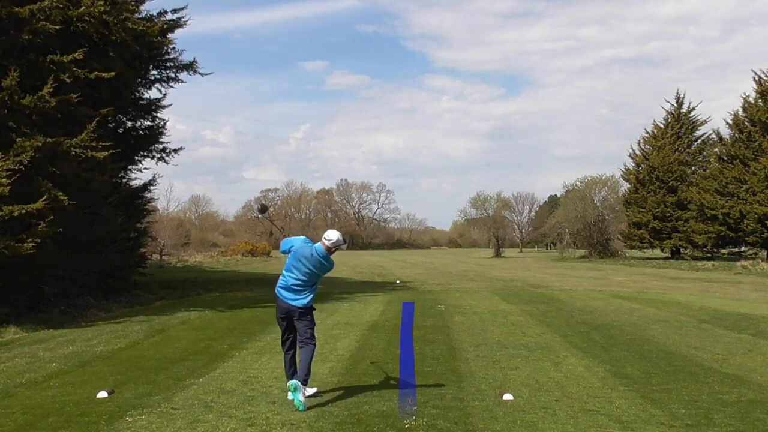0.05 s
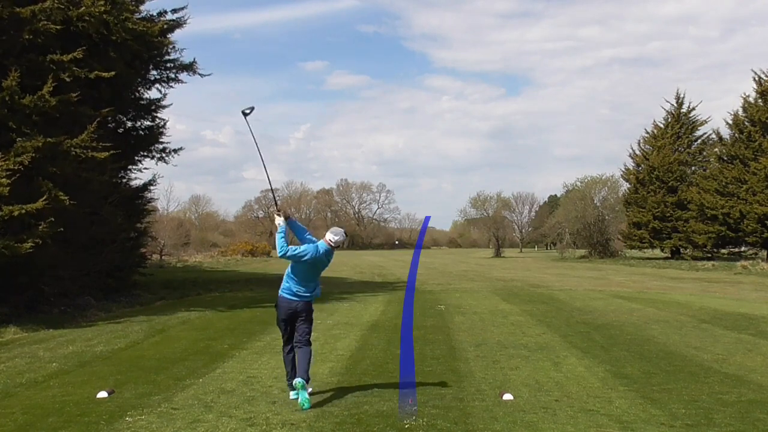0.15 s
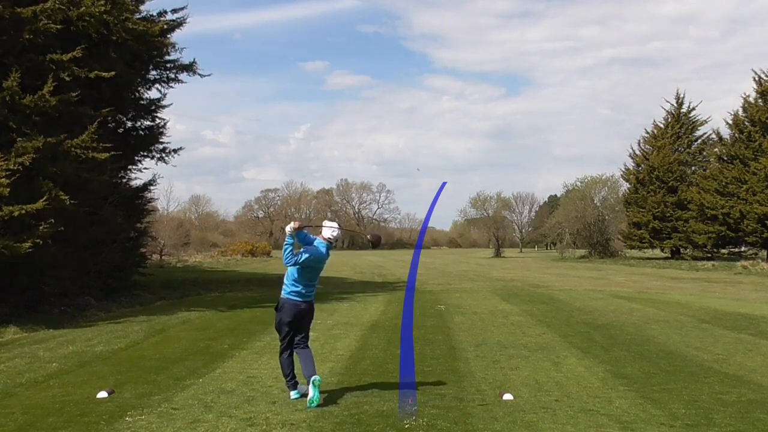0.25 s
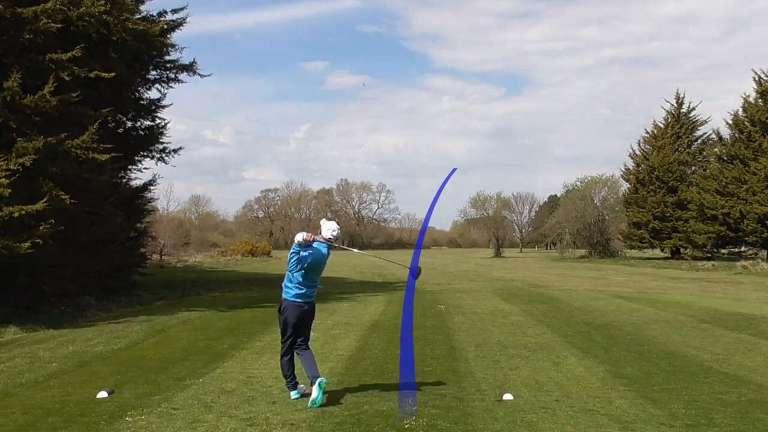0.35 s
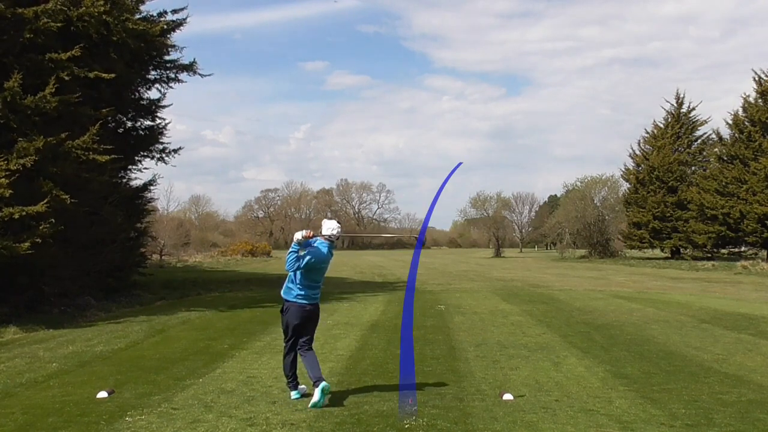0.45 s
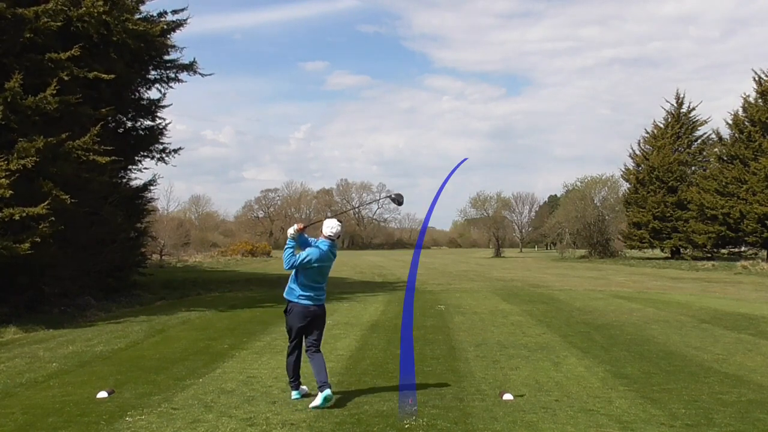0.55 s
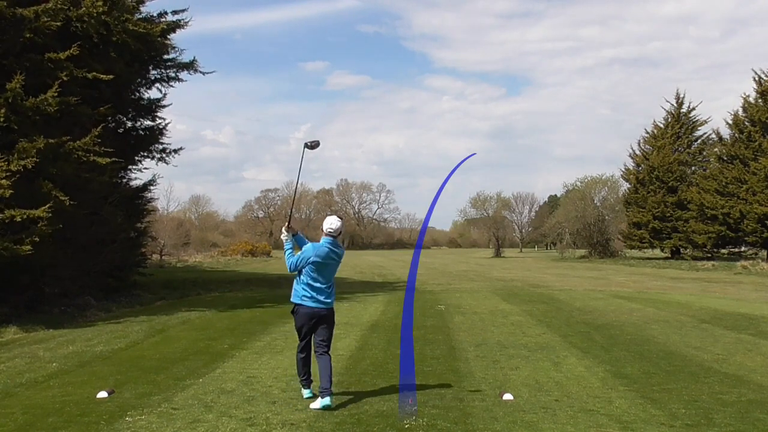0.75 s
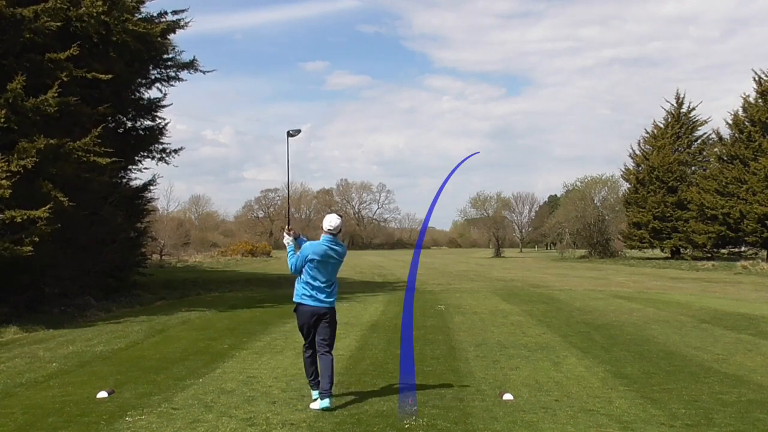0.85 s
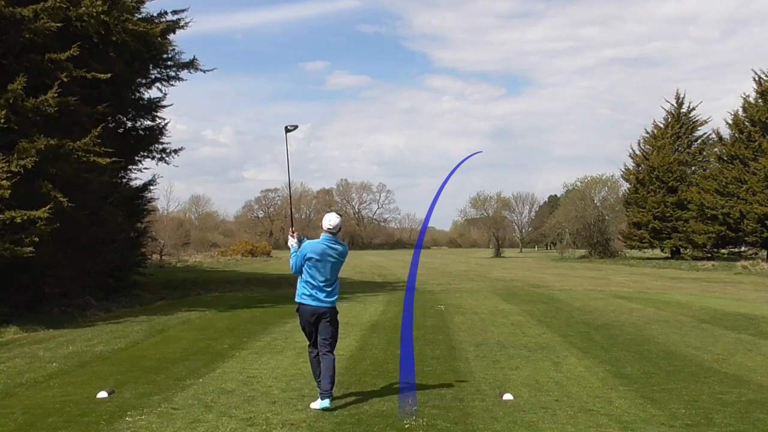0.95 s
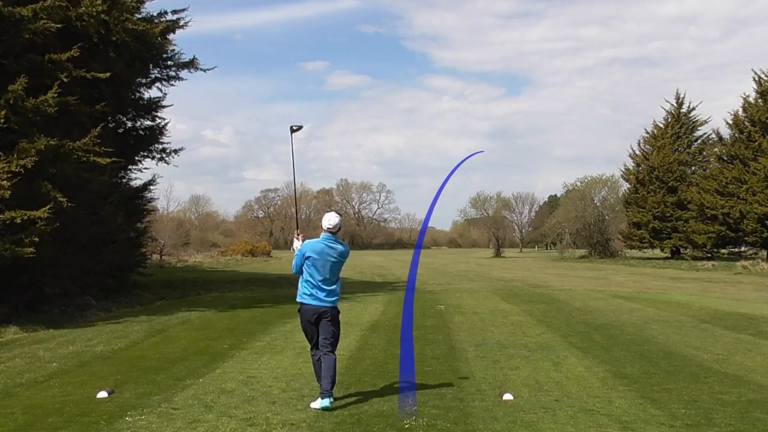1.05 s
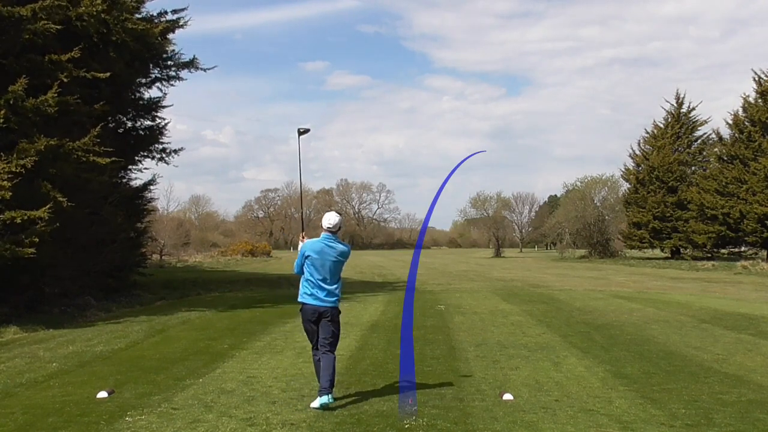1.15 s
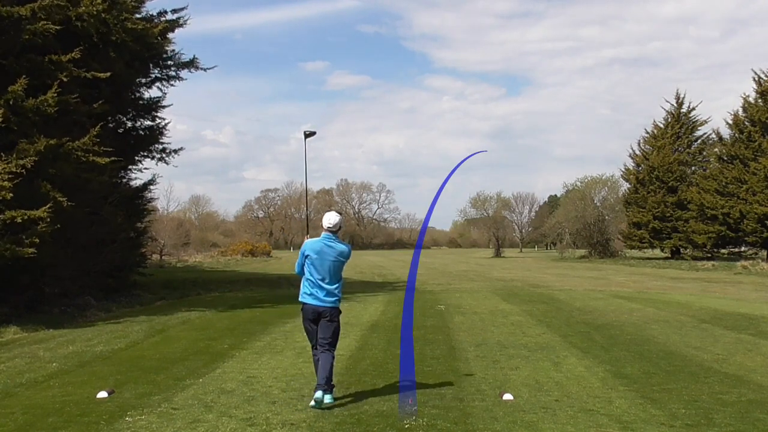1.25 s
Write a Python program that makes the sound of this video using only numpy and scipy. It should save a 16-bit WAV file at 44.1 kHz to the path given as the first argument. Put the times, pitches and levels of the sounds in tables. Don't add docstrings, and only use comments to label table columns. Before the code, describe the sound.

A golf club swishes briefly and strikes a ball with one sharp, bright metallic crack; a short grainy echo returns from trees, then low wind continues on an open course, heard in stereo from a few metres away.

```python
import sys
import numpy as np
from scipy import signal
from scipy.fft import rfft, irfft
from scipy.io import wavfile
from scipy.ndimage import uniform_filter1d

SR = 44100
rng = np.random.default_rng(int(sys.argv[2]) if len(sys.argv) > 2 else 0)


def convert_level_to_amplitude(level_db):
    exponent = np.asarray(level_db, float) / 20
    return 10 ** exponent


def persist_wave(psi):
    counts = np.round(np.clip(psi, -1, 1) * 32767).astype(np.int16)
    wavfile.write(sys.argv[1], SR, np.atleast_2d(counts).T)


N = 57330

STRIKE_S = .24855
FACE_DELAY_S = .00031
WIND_FLICKER_DB, WASH_FLICKER_DB = 1.5, 2.6
# (frequency [Hz], density [dB per Hz])
SCATTER = [(300, -10), (1400, 0.5), (2800, -18), (4300, -2), (5300, -12.5), (7000, -7), (9500, -8.5),
           (14000, -18)]
# (frequency [Hz], density [dB per Hz])
HISS_COLOUR = [(1470, -15), (2500, -2.5), (2620, -9), (2840, -13), (3190, -2.5), (15000, -7.5),
               (16500, -25.5)]


def curve(table, hz):
    points_hz, values = np.array(table).T
    return np.interp(np.log(hz), np.log(points_hz), values)


def unit(x):
    return x / np.sqrt(np.mean(x ** 2))


def walk(rate_hz):
    k = int(SR / rate_hz)
    steps = np.repeat(rng.standard_normal(N // k + 1), k)
    return 1.284 * uniform_filter1d(uniform_filter1d(steps, k), k)[:N]


def air(table, like, flicker_db=0., swell_db=0., lean=((1, 0), (2, 0))):
    hz = np.maximum(np.arange(N // 2 + 1) * SR / N, 1)
    likeness = np.clip(curve(like, hz) if np.ndim(like) else like, 0, .99)
    mid, side = rfft(rng.standard_normal((2, N)))
    mid, side = mid * np.sqrt(1 + likeness), side * np.sqrt(1 - likeness)
    low_hz, high_hz = table[0][0], table[-1][0]
    level_db = curve(table, hz) + np.outer([.5, -.5], curve(lean, hz))
    pair = np.array([mid + side, mid - side]) * convert_level_to_amplitude(level_db) * ((hz >= low_hz) & (hz <= high_hz))
    out, swell, place = 0, walk(.95), 2 * np.log2(hz / 20)
    first, last = int(2 * np.log2(low_hz / 20)), int(2 * np.log2(high_hz / 20)) + 1
    for band in range(first, last + 1):
        part = irfft(pair * np.clip(1 - abs(place - band), 0, 1), N)
        out = out + part * convert_level_to_amplitude(swell_db * swell + flicker_db * walk(13.68))
    return unit(out)


def fade(t, t60_s):
    return (t >= 0) * convert_level_to_amplitude(-60 * np.maximum(t, 0) / t60_s)


def push(u):
    dip_s, dip_db, dip_start = .0003, -5, .38
    crest_s, crest_db = .00068, -11
    thud_hz, thud_t60_s, thud_db, thud_mid_db = 250, .02, -11.5, -24
    low_cut_hz = 150
    onset = np.clip(u / .00005, 0, 1)
    release = np.clip((dip_s - u) / .0001 + 1, 0, 1)
    dip = -convert_level_to_amplitude(dip_db) * onset * (dip_start + (1 - dip_start) * u / dip_s) * release
    crest = convert_level_to_amplitude(crest_db) * np.sin(np.pi * np.clip((u - dip_s) / crest_s, 0, 1)) ** 2.2
    thud = np.cos(2 * np.pi * thud_hz * u) * fade(u, thud_t60_s) * np.clip(u / dip_s, 0, 1)
    thud = thud * (convert_level_to_amplitude(thud_db) * np.array([[1], [-1]]) - convert_level_to_amplitude(thud_mid_db))
    return signal.lfilter(*signal.butter(2, low_cut_hz, "high", fs=SR), dip + crest + thud)


def face_ring(f):
    # (frequency [Hz], level [dB], t60 [s])
    modes = [(5910, 0, .045), (5670, -19, .06), (7860, -8, .03), (8430, -9, .015), (4330, -21, .07),
             (6700, -14, .015), (9400, -13, .01), (10400, -16, .015), (11930, -10, .015), (14000, -9, .008),
             (15330, -11, .006), (2100, -24, .008)]
    rise_s, face_db, lean_db = .00032, -12, -3
    shell_hz, shell_db, shell_t60_s, rough_db = 5980, -33, .15, 5
    ring = 0
    for hz, db, t60_s in modes:
        ring = ring + convert_level_to_amplitude(db) * np.sin(2 * np.pi * hz * f) * fade(f, t60_s)
    ring = ring * np.clip(f / rise_s, 0, 1)
    shell = np.sin(2 * np.pi * shell_hz * f) * fade(f, shell_t60_s)
    shell = shell * convert_level_to_amplitude(shell_db + rough_db * walk(400))
    return convert_level_to_amplitude(face_db + lean_db * np.array([[.5], [-.5]])) * ring + shell


def crack(f):
    # (frequency [Hz], density [dB per Hz])
    spray_colour = [(3500, -1.5), (4400, 2.5), (5100, -14), (6000, 1.5), (8000, 0), (12000, -1),
                    (14500, -15)]
    crack_db, crack_t60_s = -11, .0027
    spray_db, spray_t60_s, spray_rise_s, rough_db = -24, .05, .0018, 5
    burst = convert_level_to_amplitude(crack_db) * air([(6200, -12), (8500, -2), (12500, 0), (16300, -5)], .6)
    spray = convert_level_to_amplitude(spray_db + rough_db * walk(600)) * air(spray_colour, .6)
    spray = spray * fade(f, spray_t60_s) * np.clip(f / spray_rise_s, 0, 1)
    return burst * fade(f, crack_t60_s) + spray


def turf(f):
    turf_db, t60_s = -38, .22
    return convert_level_to_amplitude(turf_db) * air(SCATTER, .6, WASH_FLICKER_DB) * fade(f, t60_s)


def strike(t):
    u = t - STRIKE_S
    f = u - FACE_DELAY_S
    return push(u) + face_ring(f) + crack(f) + turf(f)


def trees(t):
    # (delay [s], rise [s], t60 [s], level [dB])
    rows = [
        (0.082, 0.0069, .4, -38),
        (.15, .05, 0.43, -52.5),
        (.35, 0.042, 0.59, -59),
    ]
    # (frequency [Hz], width [Hz], level [dB])
    ring_bands = [(6880, 500, -5), (4300, 240, -10.5), (6170, 300, -16), (910, 540, -1.5)]
    like = .31
    shape = 0
    for delay_s, rise_s, t60_s, db in rows:
        u = t - STRIKE_S - delay_s
        shape = shape + convert_level_to_amplitude(db) * np.clip(u / rise_s, 0, 1) * fade(u, t60_s)
    wash = air(SCATTER, like, WASH_FLICKER_DB)
    for hz, width_hz, db in ring_bands:
        source = air([(300, 0), (9000, 0)], like)
        wash = wash + convert_level_to_amplitude(db) * unit(signal.lfilter(*signal.iirpeak(hz, hz / width_hz, fs=SR), source))
    return shape * wash


def swing(t):
    # (frequency [Hz], density [dB per Hz])
    swish_colour = [(1060, -47.5), (1800, -2.5), (2740, -6.5), (7990, -5.5), (10500, -9), (11600, -6.5),
                    (16000, -17)]
    # (frequency [Hz], density [dB per Hz])
    whoosh_colour = [(71, -34), (120, -3), (346, 2), (535, -18), (693, -4.5), (2000, -28), (2600, -47),
                     (4400, -120)]
    start_s, fade_in_s, rise_db_per_s, fall_s = .12, .033, 170, .012
    swish_db, whoosh_db = -45.5, -34.5
    u = t - STRIKE_S
    speed = np.where(u < 0, convert_level_to_amplitude(rise_db_per_s * u), np.exp(-np.maximum(u, 0) / fall_s))
    speed = speed * np.clip((t - start_s) / fade_in_s, 0, 1)
    swish = convert_level_to_amplitude(swish_db) * air(swish_colour, .62, WIND_FLICKER_DB)
    whoosh = convert_level_to_amplitude(whoosh_db) * air(whoosh_colour, .94, WASH_FLICKER_DB)
    return speed * (swish + whoosh)


def ticks(t):
    # (time [s], level [dB], centre [Hz])
    clicks = [(.1205, -46, 6000), (.1205, -46, 2500), (.130, -43, 2200), (.158, -52, 7000),
              (.538, -54, 9000), (.338, -33, 1500), (.267, -32, 1300), (.268, -34, 7500), (.284, -30, 1000)]
    out = 0
    for start_s, db, hz in clicks:
        burst = rng.standard_normal(N) + .6 * rng.standard_normal((2, N))
        burst = burst * fade(t - start_s, .01)
        band = signal.butter(2, [hz / 1.6, hz * 1.6], "band", fs=SR)
        out = out + convert_level_to_amplitude(db) * signal.lfilter(*band, burst)
    return out


def wind():
    # (frequency [Hz], density [dB per Hz])
    wind_colour = [(15, -54.5), (25, -14), (90, -8), (305, -9), (360, -12), (425, -11.5), (840, -9),
                   (1880, -31.5), (3500, -46.5), (4550, -61), (7700, -120)]
    # (frequency [Hz], correlation, clipped to 0..0.99)
    port_likeness = [(60, 0.99), (130, 0.95), (290, 0.94), (640, 0.35), (1410, 0.69), (3100, -2.2),
                     (6820, -0.02), (15000, 0.03)]
    # (frequency [Hz], difference [dB])
    port_lean = [(200, -1.5), (500, -2.5), (1300, 3.5), (4000, -1.5)]
    wind_db, swell_db, left_lag_samples = -43, .7, 2
    out = convert_level_to_amplitude(wind_db) * air(wind_colour, port_likeness, WIND_FLICKER_DB, swell_db, port_lean)
    out[0] = np.roll(out[0], left_lag_samples)
    return out


def leaves():
    leaves_db, flicker_db = -71, .6
    return convert_level_to_amplitude(leaves_db) * air(HISS_COLOUR, .05, flicker_db)


def mower():
    # (frequency [Hz], rms level [dB])
    lines = [(91, -52), (184, -59.5), (273, -63)]
    drift, throb_db = .02, 2.5
    turns_s = np.cumsum(1 + drift * walk(7)) / SR
    out = 0
    for hz, db in lines:
        level = convert_level_to_amplitude(db + throb_db * walk(11.9)) * np.sqrt(2)
        out = out + level * np.sin(2 * np.pi * hz * turns_s)
    return out


def birds(t):
    # (time [s], length [s], from [Hz], to [Hz], level [dB])
    peeps = [(.69, .09, 2520, 2400, -70), (.77, .07, 2400, 2510, -68), (.83, .04, 2400, 2100, -70),
             (.99, .036, 2760, 2910, -64), (.995, .04, 4900, 4950, -73), (.975, .025, 4050, 4000, -73)]
    out = 0
    for start_s, length_s, from_hz, to_hz, db in peeps:
        w = np.clip((t - start_s) / length_s, 0, 1)
        phase = 2 * np.pi * np.cumsum(from_hz + (to_hz - from_hz) * w) / SR
        swell = np.sqrt(np.sin(np.pi * w).clip(0))
        out = out + convert_level_to_amplitude(db + 2.6 * walk(60.2)) * swell * np.sin(phase)
    return out


def scene():
    t = np.arange(N) / SR
    club = strike(t) + trees(t) + swing(t) + ticks(t)
    return club + wind() + leaves() + mower() + birds(t)


def band_limit(x):
    return signal.sosfilt(signal.butter(12, 17680, fs=SR, output="sos"), x)


def record(dry):
    lag_s, snap_s, snap_db = .0024, .00015, -13
    sag_s, sag_db, hold_s, climb_s = .016, -7, .08, .17
    self_db, top_hz, rumble_cut_hz = -65, 16700, 36
    u = np.arange(N) / SR - STRIKE_S - lag_s
    down_db = snap_db * np.clip(u / snap_s, 0, 1) + sag_db * (1 - np.exp(-np.maximum(u, 0) / sag_s))
    gain = convert_level_to_amplitude(down_db * np.clip(1 - (u - hold_s) / climb_s, 0, 1))
    wet = dry * gain + convert_level_to_amplitude(self_db) * air(HISS_COLOUR, 0.)
    wet = signal.sosfilt(signal.ellip(8, .2, 60, top_hz, fs=SR, output="sos"), wet)
    wet = signal.lfilter(*signal.butter(2, rumble_cut_hz, "high", fs=SR), wet)
    return band_limit(wet)


dry = scene()
out = record(dry)
persist_wave(out)
```